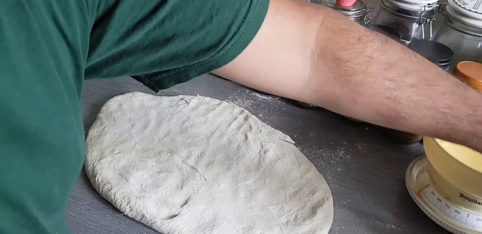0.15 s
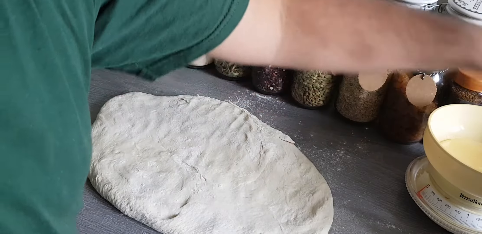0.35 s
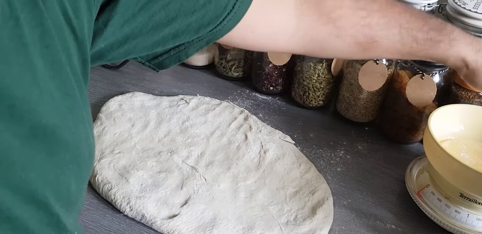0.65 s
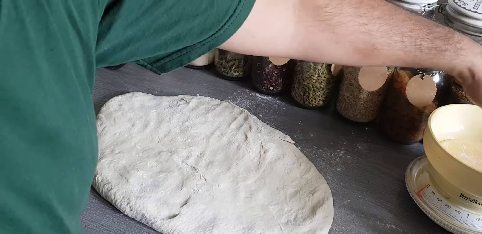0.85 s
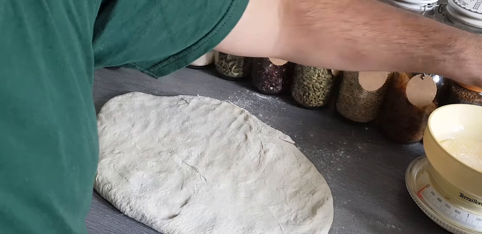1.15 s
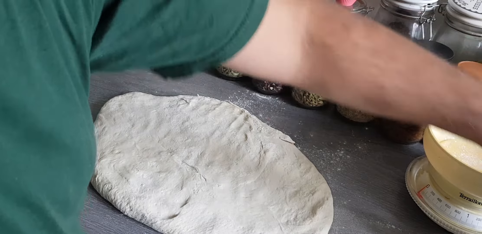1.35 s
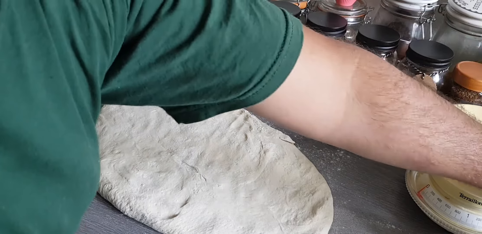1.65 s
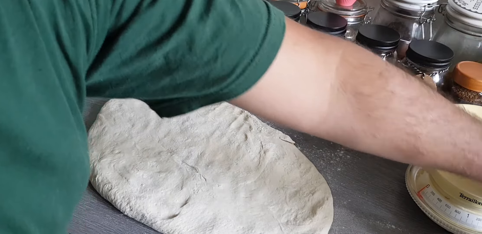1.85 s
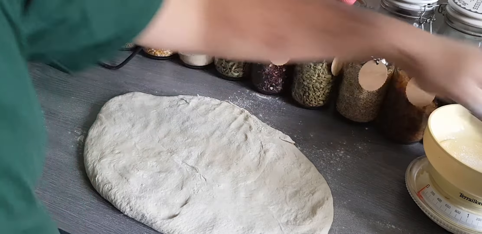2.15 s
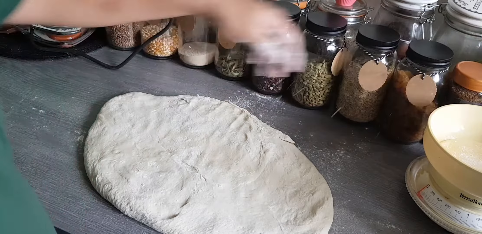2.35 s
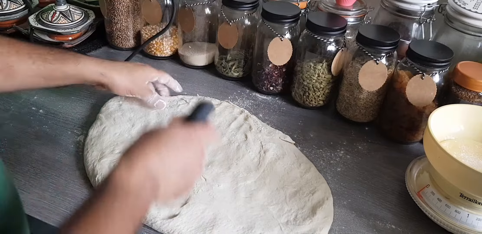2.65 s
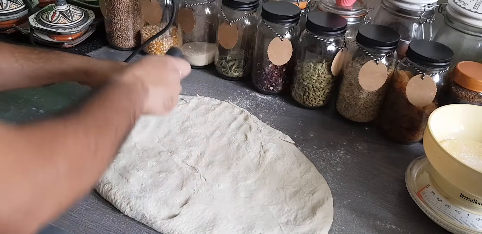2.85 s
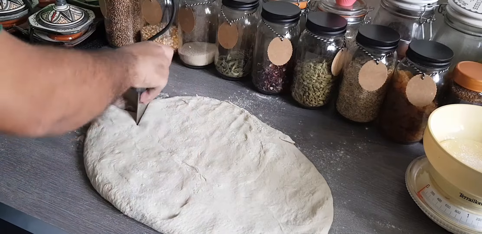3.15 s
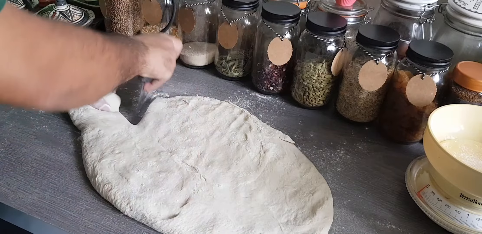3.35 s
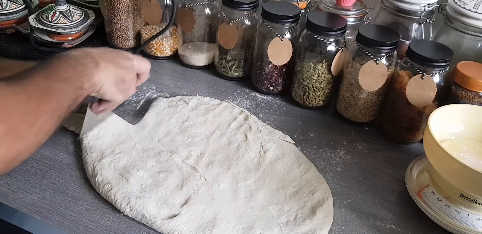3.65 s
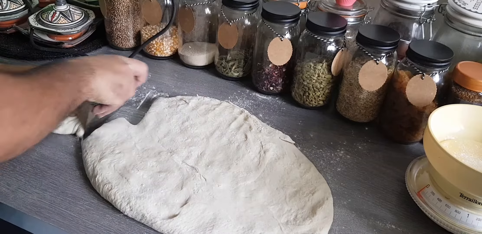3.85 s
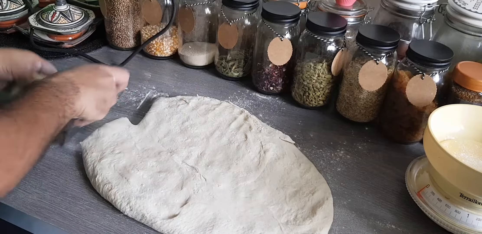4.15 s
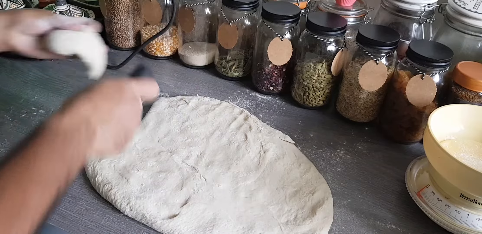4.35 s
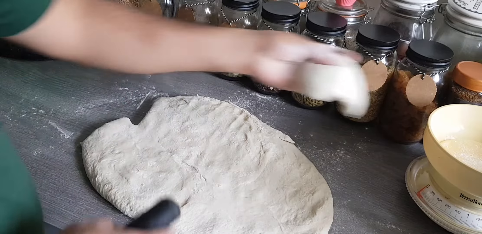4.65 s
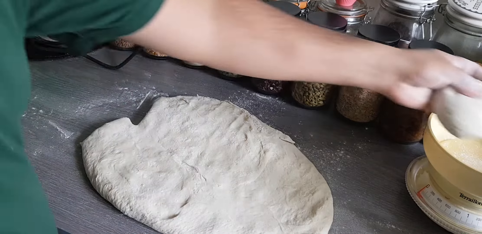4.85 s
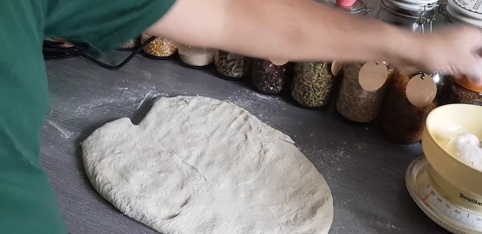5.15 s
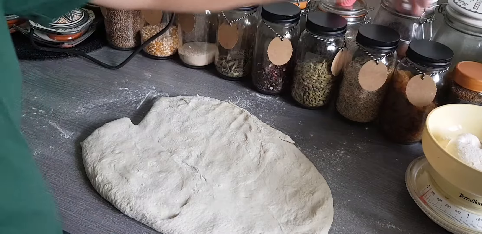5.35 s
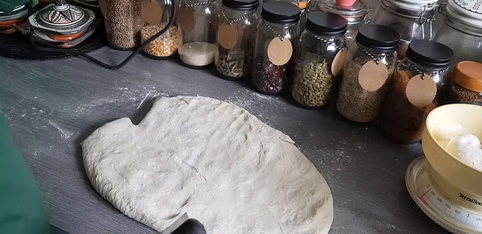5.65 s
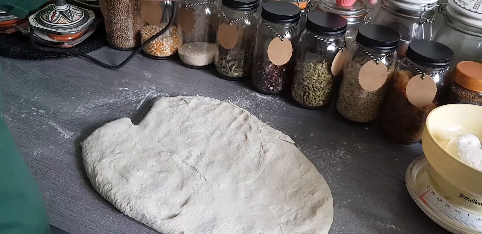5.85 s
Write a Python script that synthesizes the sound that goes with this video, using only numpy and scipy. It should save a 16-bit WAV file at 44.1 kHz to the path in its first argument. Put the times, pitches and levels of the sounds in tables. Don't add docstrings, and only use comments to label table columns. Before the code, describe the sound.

Gritty, papery rustling comes in quick bursts with dry clicks and tiny squeaks, then thins out. Scraping strokes and two muffled chops through dough follow, then a hard blade strike that rings wood and metal briefly. Later a hollow plop with a wet-sounding slap lands in a bowl, leaving faint rustle and distant hum. Near microphone, short bright room echoes.

```python
import sys
import numpy as np
from scipy import signal
from scipy.fft import rfft, irfft, next_fast_len
from scipy.io import wavfile
from scipy.ndimage import uniform_filter1d, map_coordinates

SR = 44100
rng = np.random.default_rng(int(sys.argv[2]) if len(sys.argv) > 2 else 0)


def gain_from_decibels(decibels):
    exponent = np.asarray(decibels, float) / 20
    return 10 ** exponent


def pcm_store(signal):
    levels = np.round(np.clip(np.atleast_2d(signal), -1, 1) * 32767)
    wavfile.write(sys.argv[1], SR, levels.astype(np.int16).T)


N = 264159
TIME = np.arange(N) / SR

# pitch_hz, level_db (per Hz)
HUM_SPECTRUM = [(18, -40), (36, 1), (105, -1.5), (140, -8), (164, -8), (379, -7), (467, -11.5), (808, -3.5),
                (1050, -17), (1590, -11), (3150, -18), (3880, -17.5), (8500, -28.5), (15500, -26.5)]
# pitch_hz, width_hz, level_db
HUM_BANDS = [(710, 40, -74.5), (1580, 110, -77.5)]
# pitch_hz, likeness (-1 to 1)
HUM_LIKENESS = [(60, -0.47), (180, 0.96), (550, 0.47), (1650, -0.19), (4970, -0.2), (15000, 0.26)]
# pitch_hz, t60_s (time to fade by 60 dB)
ECHO_TIMES = [(80, 0.81), (250, 0.39), (1000, 0.34), (4000, 0.35), (12000, 0.29)]
# pitch_hz, likeness (-1 to 1)
ECHO_LIKENESS = [(60, 0.94), (180, 1), (550, 0.19), (1650, 0.01), (4970, 0.056), (15000, 0.09)]
# time_s, left_lag_samples (how late the left side hears them)
SIDE_LAG = [(0, 9.5), (2.3, 11), (2.8, -4), (4.4, -6.5), (4.9, 13), (5.99, 2.5)]

# start_s, peak_db, pitch_hz, t60_s
BUMPS = [(.004, -41, 340, 0.1), (1.299, -57, 111, .1), (1.44, -52, 75, .15), (1.79, -49, 90, 0.19),
         (2.118, -44.5, 134, 0.21), (2.15, -49, 75, .2), (2.555, -48, 70, 0.23), (2.766, -43.5, 74, 0.21),
         (3.12, -51, 110, .2), (3.175, -47, 89, .15), (3.245, -49, 80, .15), (3.786, -36, 75, .12),
         (3.798, -46, 192, 0.13), (3.214, -45, 110, .08), (4.911, -52, 62, 0.18), (5.008, -47, 195, .3),
         (4.97, -55, 75, 0.32), (5.03, -50.5, 110, 0.28), (5.14, -58, 90, .3), (5.09, -52.5, 190.4, .3),
         (5.371, -64.5, 65, .15)]
# time_s, level_db
LEAN = [(0, -2), (1.2, -6), (2.5, -2), (3.05, 3.5), (3.45, -1), (3.7, -3), (4.3, 6.5), (4.75, -8),
        (5.1, 9.5), (5.45, -4), (5.99, -6)]
# start_s, length_s, pitch_hz,
# width_hz, level_db
SQUEAKS = [(.2, .11, 4000, 150, -58.5), (.42, .12, 13000, 5000, -59.5), (.72, .06, 13000, 5000, -59),
           (.96, .09, 12500, 5000, -63), (1.315, .068, 7500, 380, -53), (2.02, .019, 4150, 250, -42),
           (1.905, .035, 2760, 150, -43), (3.28, .57, 10600, 1100, -64), (5.35, .33, 10350, 1800, -74.5),
           (4.42, .55, 3600, 2900, -70), (3.258, .022, 3100, 120, -48), (3.3, .02, 3100, 120, -52),
           (1.275, .07, 1050, 70, -53)]
# pitch_hz, level_db (per Hz)
HISS_SPECTRUM = [(880, -6), (1500, 3.5), (3210, 0), (4140, 2.5), (4850, 1.5), (7300, 0.5), (8710, -5.5),
                 (11100, -0.5), (15500, -6.5)]
# pitch_hz, level_db (per Hz)
RUB_SPECTRUM = [(88, -47), (150, -13.5), (205, -5.5), (275, -8.5), (356, -2.5), (441, -4), (996, -4),
                (1430, -9), (3000, -11.5), (3900, -21.5), (6600, -120)]
# time_s, level_db
BUSY = [(0, -62), (.6, -67.5), (1.0, -66), (1.26, -67), (2.3, -65), (2.5, -67.5), (2.7, -63), (3.4, -59),
        (3.95, -63), (4.4, -68.5), (4.75, -76), (5.2, -75), (5.99, -83)]
# peak_s, rise_s (per 10 dB), fall_s (per 10 dB), hiss_db, rub_db
PAPER_STROKES = [(.005, 3, 0.028, -46.5, -33), (.05, 0.06, .035, -37.5, -36), (.14, .06, 0.09, -48, -54),
                 (.2, 0, 0.0953, -40.5, -41), (0.267, 0.07, 0.017, -36.5, -39.5),
                 (.41, -0.3, 0.27, -55, -56), (.49, 0, 0, -56, -54), (0.752, .03, 0.18, -52, -61),
                 (.86, 0.08, 0.1, -51, -55.5), (.98, 0.2, -0.2, -66, -64), (1.283, .004, 0.02, -43, -42),
                 (1.36, 0.0356, 0.22, -45, -43), (1.46, 0.0775, 0.0722, -36.5, -41.5),
                 (1.514, .03, 0.0526, -36, -43), (1.62, 0.05, 0.08, -46.5, -54),
                 (1.665, 0.02, .08, -47, -47), (1.8, 0.02, 0.1074, -42, -45.5),
                 (1.91, 0.07, 0.08, -43, -59), (2.02, 0.115, 0.08, -37, -42.5),
                 (2.116, 0.1237, 0.0329, -38, -44.5)]
# peak_s, rise_s (per 10 dB), fall_s (per 10 dB), hiss_db, rub_db
WORKTOP_STROKES = [(2.574, 0.12, 0.26, -64.5, -54.5), (2.816, 0.046, 0.079, -55.5, -42),
                   (3.026, 0.029, 0.049, -51.5, -59), (3.266, 0.044, 0.057, -46.5, -39),
                   (3.53, 0.045, 0.051, -58, -56), (3.66, .1, .1, -60, -75),
                   (3.822, 0.023, 0.091, -43, -37), (4.66, .02, 0.18, -67, -71),
                   (4.8, 0.023, 0.061, -61, -54.5), (4.99, 0.071, 0.059, -65, -64),
                   (5.372, .015, 0.31, -69.5, -80), (5.574, .1, .05, -69, -68.5),
                   (5.71, 0.088, .04, -68.5, -67)]

# start_s, peak_db, ring_hz, crack_db, contact_s
TAPS = [(0.188, -41, 860, 9.5, 0.0074), (0.254, -35, 1430, 12.5, 0.0011), (0.359, -46, 560, -17, 0.0018),
        (0.741, -51, 860, 5, 0.0013), (1.276, -33, 1050, 2.5, 0.00072), (1.436, -27.5, 1130, -8, 0.00069),
        (1.644, -44, 603, -20, 0.0012), (1.757, -40, 935, -17, 0.00062), (1.798, -22, 1220, 1.5, 0.00075),
        (1.908, -37, 1590, 8, 0.0014), (1.959, -32, 1290, -26, 0.0013), (2.028, -36, 1320, 5, 0.0022),
        (2.079, -30, 925, -31, 0.00041), (2.808, -36.5, 770, -23, 0.0034), (3.527, -52, 383, -11, 0.0017),
        (4.604, -55, 1580, -18.5, 0.00069), (4.794, -56.5, 860, -14, 0.0065)]
# start_s, peak_db, low_hz, high_hz, contact_s
SNAPS = [(.028, -25, 250, 2000, .0014), (.0285, -31, 5500, 8500, .00076), (.058, -33, 3300, 4500, .001),
         (.147, -39, 1200, 5500, .001), (.19, -38, 3000, 8500, .0006), (.2575, -30, 3600, 4600, .001),
         (.359, -36, 400, 1500, .00032), (.399, -28, 500, 2200, .0003), (.503, -39, 300, 1490, .0004),
         (1.2598, -43, 3600, 4400, .0007), (1.2598, -41, 6800, 9800, .0007),
         (1.2758, -41, 2000, 10000, .001), (1.3306, -39, 6500, 8200, .0008),
         (1.4375, -34, 900, 1900, .0008), (1.5078, -13, 900, 2200, .00022),
         (1.5078, -15, 3500, 5200, .00025), (1.6522, -24, 450, 1600, .0006),
         (1.6522, -34, 2500, 5800, .0006), (1.6585, -29, 400, 1300, .001), (1.797, -31, 3200, 5000, .0005),
         (3.2435, -33, 450, 1100, .0015)]

# start_s, hollow_db, wall_db, skin_db, contact_s
LANDINGS = [
    (4.998, -67, -51, -30.5, 0.0021),
    (5.0055, -21, -42, -55, 0.0019),
    (5.023, -58.5, -41, -23.5, 0.00086),
    (5.0306, -40, -31.5, -40, .001),
    (5.034, -25, -28.5, -42, 0.000505),
    (5.0385, -30, -35.5, -44, 0.00042),
    (5.048, -32, -29.5, -44, .0006),
    (5.058, -28, -45, -50, 0.002),
]
# pitch_hz, level_db, t60_s
BOWL_AIR = [(470, 5.5, .022), (435, -14, .12)]
# pitch_hz, level_db, t60_s
BOWL_WALL = [(1350, 10, 0.013), (2240, 5.5, 0.015), (2680, -3, 0.011)]
# pitch_hz, level_db (per Hz)
SLAP_SPECTRUM = [(350, -40), (600, -6.5), (890, 4.5), (1080, -3), (1380, 6), (2040, 2.5), (2470, -1),
                 (3240, -10), (15500, -29)]

# start_s, force_db, contact_s, crack_db, ring_db
CUTS = [
    (3.243, -32, 0.0031, -8, 6),
    (3.254, -28.5, 0.003, -11, 0.5),
    (3.788, -38, 0.005, -14, -5),
    (3.805, -29, 0.002, -11, -3),
    (3.818, -22, 0.004, -23, -1),
    (4.0352, -13, 0.00064, -0.5, 0),
    (4.0378, -3, 0.0012, -10.5, 1),
    (4.0445, -7, .0006, -10, -4),
    (4.057, -9.5, .0015, -12, -3.5),
    (3.8255, -24, .0012, -20, 0),
]
WORKTOP_HZ = [613, 661, 710, 755, 936, 980, 1091, 1214, 1274, 1402, 1464, 1529, 2040, 2180, 2328, 2457,
              2735, 2905]
# level_db, t60_s
WORKTOP_RING = [(-2, 0.24), (2.5, 0.29), (-7.5, 0.29), (-8, 0.26), (-7, 0.3), (-9, 0.37), (-14, 0.27),
                (-3.5, 0.15), (-10.5, 0.25), (-14, 0.246), (-8, 0.14), (-6, 0.23), (-7, 0.17), (-9, 0.24),
                (-17, 0.18), (-23.5, 0.19), (-19.5, 0.2), (-16, 0.237)]
# pitch_hz, level_db (per Hz)
KNOCK_SPECTRUM = [(88, -48), (185, -18), (270, -18), (359, -9), (430, -13), (643, 3), (800, -1),
                  (1250, -1.5), (1510, -4.5), (1760, -12), (2100, -5.5), (3200, -10.5), (15500, -47.5)]
# pitch_hz, level_db, t60_s
CABINET_THUMP = [(68, -1, .25), (84, -2, 0.34), (127.3, -6, 0.25), (183, -14, .2), (248, -13, .2),
                 (340, -8.5, .14)]

HUM_DB = -63
DRONE_S, DRONE_LENGTH_S, DRONE_DB = 5.38, 0.19, -63
BUSY_RUB_DB = 6
TOUCH_RISES, SWELL_POWER = 2.28, 1.82
PUSH_DB, PUSH_FOLLOWS = -61, .55
AIR_DB, BARE_AIR_DB, PAPER_ENDS_S = 0.1, -1.5, 2.6
RING_CYCLES = 7.1
TWIN_RATIO, TWIN_DB = 1.024, -3
THUMP_DB = -22.5


def rms_one(x):
    return x / np.sqrt(np.mean(x ** 2) + 1e-20)


def in_time(rows):
    s, *columns = np.transpose(rows)
    return [np.interp(TIME, s, column) for column in columns]


def at_hz(points, hz):
    table_hz, values = np.array(points)[:, 0], np.array(points)[:, 1]
    return np.interp(np.log(hz + 1e-9), np.log(table_hz), values)


def coloured(x, spectrum):
    size = next_fast_len(N)
    hz = np.arange(size // 2 + 1) * SR / size
    return rms_one(irfft(rfft(x, size) * gain_from_decibels(at_hz(spectrum, hz)), size)[:N])


def causal(spectrum, size=2048):
    hz = np.arange(size // 2 + 1) * SR / size
    cepstrum = irfft(np.log(gain_from_decibels(at_hz(spectrum, hz))), size)
    cepstrum[1:size // 2] *= 2
    cepstrum[size // 2 + 1:] = 0
    pulse = irfft(np.exp(rfft(cepstrum)), size)
    return pulse / np.abs(pulse).max()


def drift(rate_hz):
    r = np.exp(-2 * np.pi * rate_hz / SR)
    wander = signal.lfilter([1], [1, -2 * r, r * r], rng.standard_normal(N + SR))
    return rms_one(wander[SR:])


def band(x, low_hz, high_hz):
    return signal.sosfilt(signal.butter(2, [low_hz, high_hz], "band", fs=SR, output="sos"), x)


def stereo_noise(size, likeness, hz):
    raise NotImplementedError


def ring(force, hz, t60):
    r, w = gain_from_decibels(-60 / (t60 * SR)), 2 * np.pi * hz / SR
    return signal.lfilter([0, np.sin(w)], [1, -2 * r * np.cos(w), r * r], force + 1e-18)


def struck(force, modes):
    total = 0
    for k, (hz, db, t60) in enumerate(modes):
        total = total + (-1) ** k * gain_from_decibels(db) * ring(force, hz, min(t60, .33))
    return total


def contact(length_s, noise):
    t = np.arange(len(noise)) / SR / np.clip(length_s, .0002, .04)
    shape = t * np.exp(-t)
    force = noise * shape
    for _ in range(6):
        spectrum = rfft(force)
        flat = irfft(spectrum / (np.abs(spectrum) + 1e-12), len(force))
        loudness = np.sqrt(np.abs(uniform_filter1d(flat ** 2, size=33)) + 1e-12)
        force = flat / loudness * shape
    return force / np.sqrt(np.sum(force ** 2))


def two_sided(mid, side, likeness, hz):
    alike = np.clip(at_hz(likeness, hz), -1, 1)
    return np.sqrt(1 + alike) * mid + np.sqrt(1 - alike) * side * [[1], [-1]]


def hum():
    hz = np.arange(N // 2 + 1) * SR / N
    mid, side = rfft(rng.standard_normal((2, N)))
    pair = two_sided(mid, side, HUM_LIKENESS, hz)
    out = gain_from_decibels(HUM_DB) * rms_one(irfft(pair * gain_from_decibels(at_hz(HUM_SPECTRUM, hz)), N))
    for peak_hz, width_hz, db in HUM_BANDS:
        resonance = 1 + (2 * (hz - peak_hz) / width_hz) ** 2
        out = out + gain_from_decibels(db + 2.7 * drift(2.1)) * rms_one(irfft(pair / resonance, N))
    return out


def drone():
    swell = np.sin(np.pi * np.clip((TIME - DRONE_S) / DRONE_LENGTH_S, 0, 1))
    pitch_hz = 222 + 8.9 * drift(12)
    return np.sin(2 * np.pi * np.cumsum(pitch_hz) / SR) * gain_from_decibels(DRONE_DB) * swell


def kitchen(x):
    t, tail = np.arange(SR // 2) / SR, 0
    for hz in 60 * 2 ** np.arange(9.):
        mid, side = rng.standard_normal((2, SR // 2))
        pair = two_sided(mid, side, ECHO_LIKENESS, hz)
        octave = band(pair, hz / np.sqrt(2), min(hz * np.sqrt(2), .45 * SR))
        tail = tail + octave * gain_from_decibels(-60 * t / at_hz(ECHO_TIMES, hz))
    tail = tail * (1 - np.exp(-t / 0.00067))
    tail = tail / np.sqrt(np.sum(tail ** 2) / 2)
    return signal.fftconvolve(x[None], tail, axes=1)[:, :N]


def placed(x):
    lag, = in_time(SIDE_LAG)
    at = np.arange(N)
    left = map_coordinates(x, [at - lag / 2], order=3)
    right = map_coordinates(x, [at + lag / 2], order=3)
    return np.array([left, right])


def bumps():
    out = np.zeros(N)
    for s, peak_db, hz, t60 in BUMPS:
        push = gain_from_decibels(peak_db) * (np.arange(N) == round(s * SR))
        out += band(ring(push, hz, t60), .5 * hz, 2 * hz)
    return out


def squeaks():
    out, size = np.zeros(N + SR), SR * 3 // 5
    for (s, length_s, hz, width_hz, db), noise in zip(SQUEAKS, rng.standard_normal((len(SQUEAKS), size))):
        swell = np.sin(np.pi * np.clip(np.arange(size) / SR / length_s, 0, 1))
        t60 = np.log(1000) / np.pi / width_hz
        narrow = band(ring(noise, hz, t60), .7 * hz, 1.6 * hz)
        out[round(s * SR):][:size] += gain_from_decibels(db) * swell * rms_one(narrow)
    return out[:N]


def grit(per_s, spread_db):
    sizes = gain_from_decibels(spread_db * np.minimum(rng.exponential(1, N), 4)) * rng.choice([-1, 1], N)
    return sizes * (rng.random(N) < per_s / SR)


def flour(gain):
    air_db = np.where(TIME < PAPER_ENDS_S, AIR_DB, BARE_AIR_DB)
    hiss = coloured(grit(9000, spread_db=3.0), HISS_SPECTRUM)
    return gain * (hiss + (gain_from_decibels(air_db) - 1) * band(hiss, 8500, 16000))


def strokes():
    t, busy_db = TIME[::32], in_time(BUSY)[0][::32]
    hiss, rub = gain_from_decibels(busy_db) ** 2, gain_from_decibels(busy_db + BUSY_RUB_DB) ** 2
    for s, rise_s, fall_s, hiss_db, rub_db in PAPER_STROKES + WORKTOP_STROKES:
        swell = np.clip(1 - (s - t) / (TOUCH_RISES * max(rise_s, .003)), 0, 1) ** SWELL_POWER
        fade = gain_from_decibels(-10 * np.maximum(t - s, 0) / max(fall_s, .003))
        shape = (swell * fade) ** 2
        hiss = hiss + gain_from_decibels(hiss_db) ** 2 * shape
        rub = rub + gain_from_decibels(rub_db) ** 2 * shape
    return np.interp(TIME, t, np.sqrt(hiss)), np.interp(TIME, t, np.sqrt(rub))


def handling():
    hiss_gain, rub_gain = strokes()
    push_gain = gain_from_decibels(PUSH_DB + in_time(LEAN)[0]) * (rub_gain / gain_from_decibels(-49.5)) ** PUSH_FOLLOWS
    flicker = drift(36)
    hiss_gain = hiss_gain * gain_from_decibels(0.7 * flicker)
    rub_gain = rub_gain * gain_from_decibels(1.2 * flicker + 1.07 * drift(30))
    spot, left, right = (flour(hiss_gain) for _ in range(3))
    rub = coloured(grit(3500, spread_db=2.0), RUB_SPECTRUM) * rub_gain
    push = rms_one(band(rng.standard_normal(N), 45, 150)) * push_gain * gain_from_decibels(2.8 * drift(8))
    slide = gain_from_decibels(-7) * spot + gain_from_decibels(-6) * rub + squeaks()
    scattered = gain_from_decibels(1) * np.array([left, right])
    return slide, scattered, push + bumps()


def taps():
    out, noise = np.zeros(N), rng.standard_normal((len(TAPS), 2, 2048))
    for (s, peak_db, hz, crack_db, length_s), (force, snap) in zip(TAPS, noise):
        body = band(ring(contact(length_s, force), hz, RING_CYCLES / hz), 0.36 * hz, 5.0 * hz)
        crack = band(contact(.5 * length_s, snap), 1500, 8500)
        sound = body / np.abs(body).max() + gain_from_decibels(crack_db) * crack / np.abs(crack).max()
        out[round(s * SR):][:2048] += gain_from_decibels(peak_db - 0.5) * sound
    return out


def snaps():
    out = np.zeros(N)
    for (s, peak_db, low_hz, high_hz, length_s), force in zip(SNAPS, rng.standard_normal((len(SNAPS), 1024))):
        click = band(contact(length_s, force), low_hz, high_hz)
        out[round(s * SR):][:1024] += gain_from_decibels(peak_db) * click / np.abs(click).max()
    return out


def bowl():
    forces, noise = np.zeros((3, N)), rng.standard_normal((len(LANDINGS), 3, 2048))
    for (s, *levels_db, length_s), grains in zip(LANDINGS, noise):
        for force, db, grain in zip(forces, levels_db, grains):
            force[round(s * SR):][:2048] += gain_from_decibels(db) * contact(length_s, grain)
    on_air, on_wall, on_skin = forces
    hollow = band(struck(on_air, BOWL_AIR), 364, 670)
    wall = band(struck(on_wall, BOWL_WALL), 670, 11000)
    slap = gain_from_decibels(15.5) * signal.fftconvolve(on_wall, causal(SLAP_SPECTRUM))[:N]
    skin = gain_from_decibels(13) * band(on_skin, 4600, 11400)
    return hollow + wall + slap + skin


def cuts():
    force, ringing, crack, thump = np.zeros((4, N))
    noise = rng.standard_normal((len(CUTS), 2, 4096))
    for (s, force_db, length_s, crack_db, ring_db), (grain, snap) in zip(CUTS, noise):
        at, blow = round(s * SR), gain_from_decibels(force_db) * contact(length_s, grain)
        force[at:at + 4096] += blow
        ringing[at:at + 4096] += gain_from_decibels(ring_db) * blow
        crack[at:at + 4096] += gain_from_decibels(force_db + crack_db) * contact(length_s, snap)
        thump[at + 100] += gain_from_decibels(force_db + THUMP_DB)
    knock = signal.fftconvolve(force, causal(KNOCK_SPECTRUM))[:N] + gain_from_decibels(-3.0) * band(crack, 3300, 10000)
    modes = [(hz, db, t60) for hz, (db, t60) in zip(WORKTOP_HZ, WORKTOP_RING)]
    twins = [(hz * TWIN_RATIO, db + TWIN_DB, t60) for hz, db, t60 in modes]
    worktop = gain_from_decibels(-16.5) * struck(ringing, modes + twins)
    return knock, worktop, band(struck(thump, CABINET_THUMP), 35, 420)


def scene():
    slide, scattered, push = handling()
    tap, snap, drop = taps(), snaps(), bowl()
    knock, worktop, thump = cuts()
    direct = slide + tap + snap + drop + gain_from_decibels(4.5) * knock + worktop
    to_room = gain_from_decibels(-0.5) * slide + gain_from_decibels(4.5) * tap + gain_from_decibels(-3.0) * snap
    to_room = to_room + gain_from_decibels(-2.0) * drop + gain_from_decibels(6.5) * knock + gain_from_decibels(-8.0) * worktop
    low = (push + thump + drone()) * gain_from_decibels([[1.5], [-1.5]])
    return (placed(direct) + scattered + kitchen(to_room) + hum()) * gain_from_decibels([[.4], [-.4]]) + low


def band_limit(x):
    return signal.sosfilt(signal.butter(12, 16740, fs=SR, output="sos"), x)


def record(dry):
    rounded = 1.398 * np.tanh(dry / 1.402)
    top_cut = signal.cheby2(20, 70, 16250, fs=SR, output="sos")
    finished = signal.sosfilt(top_cut, rounded)
    return band_limit(finished)


dry = scene()
out = record(dry)
pcm_store(out)
```